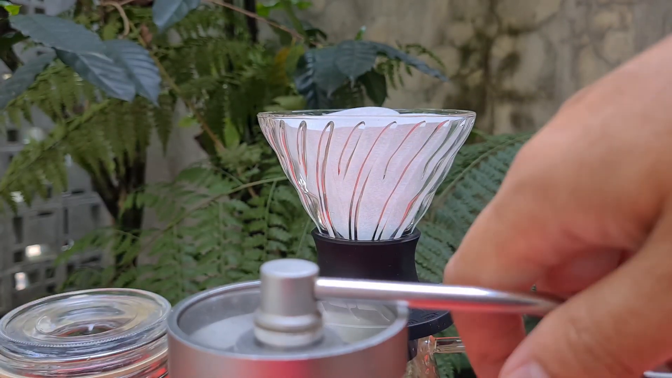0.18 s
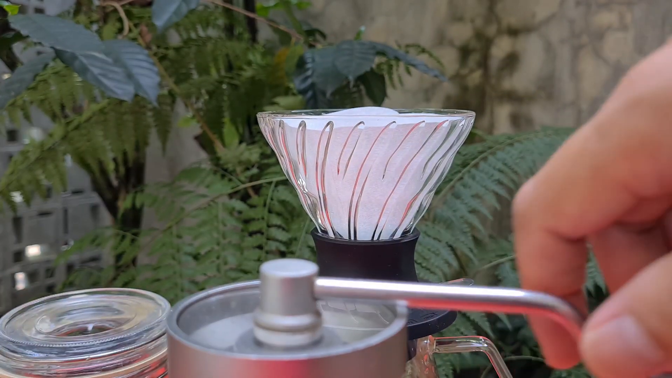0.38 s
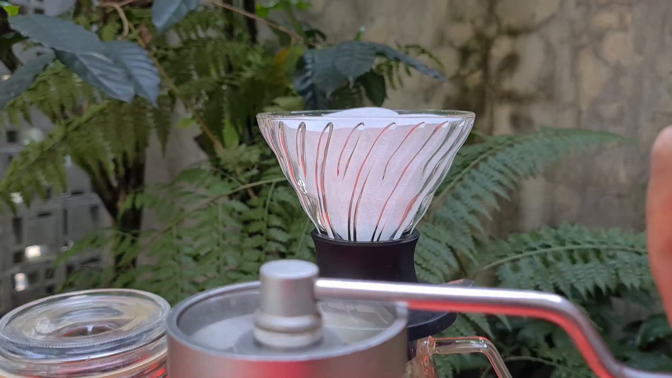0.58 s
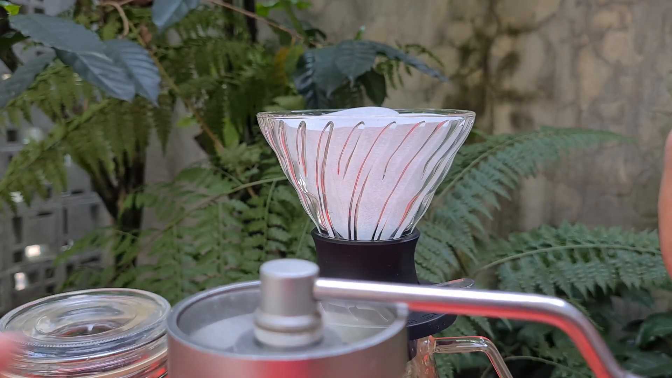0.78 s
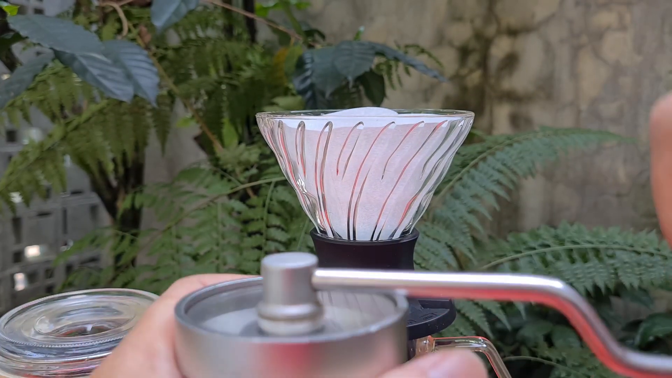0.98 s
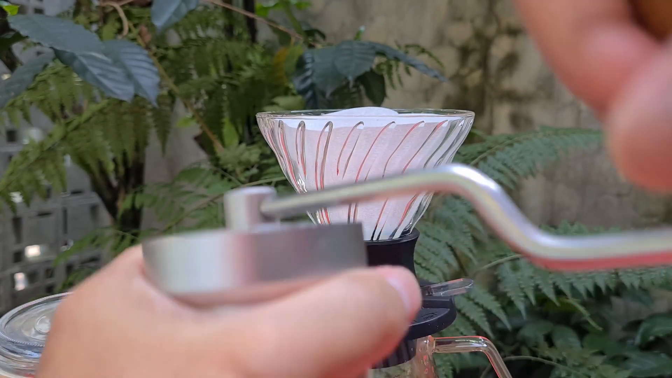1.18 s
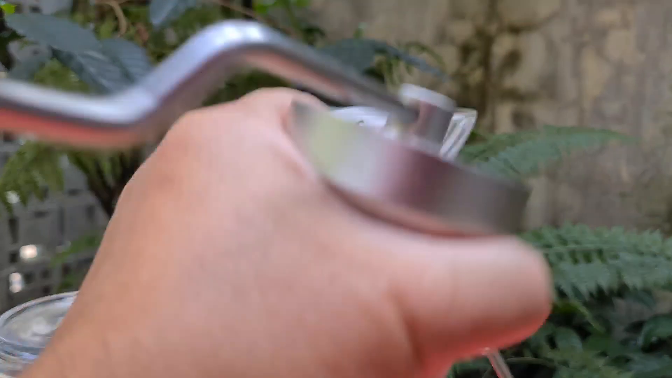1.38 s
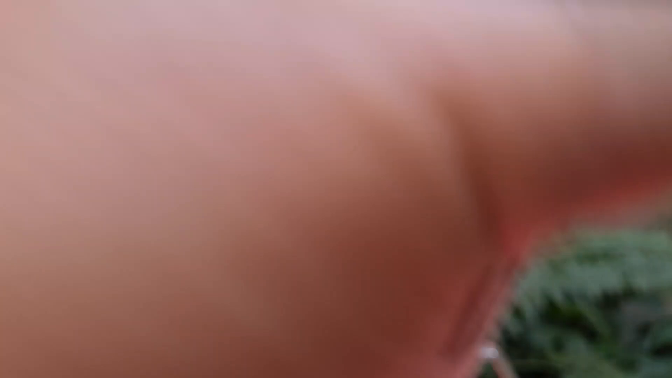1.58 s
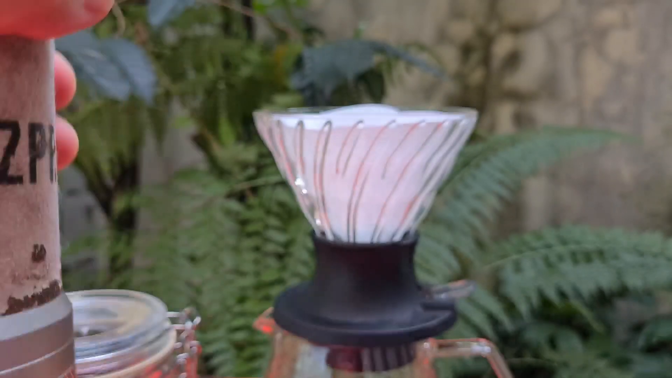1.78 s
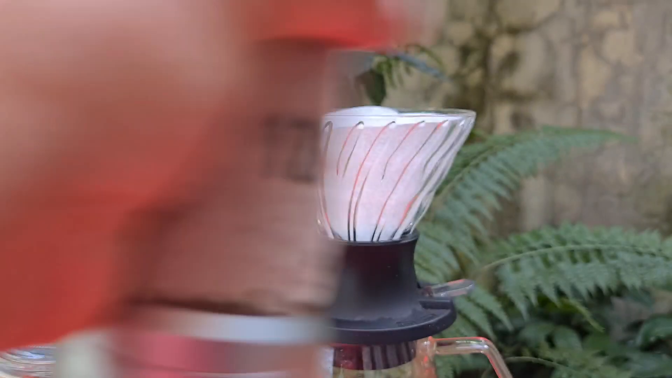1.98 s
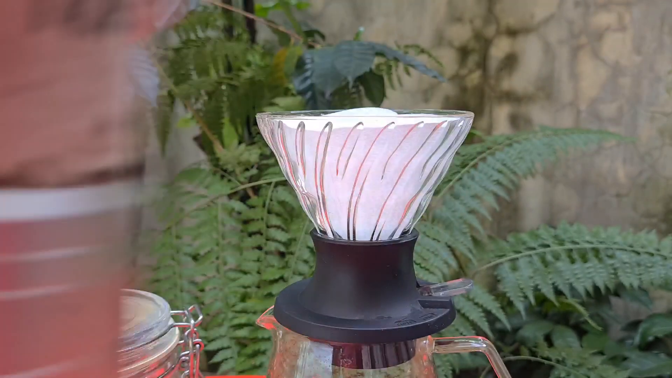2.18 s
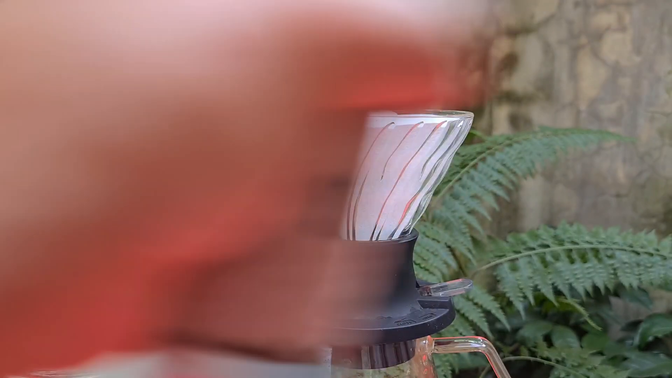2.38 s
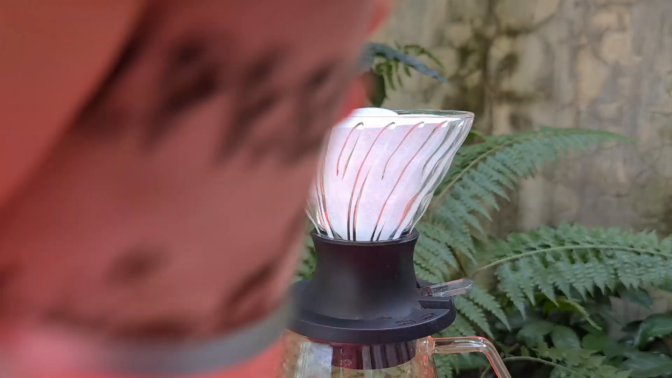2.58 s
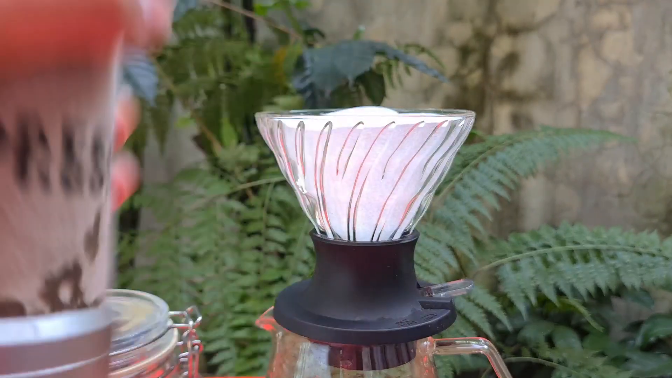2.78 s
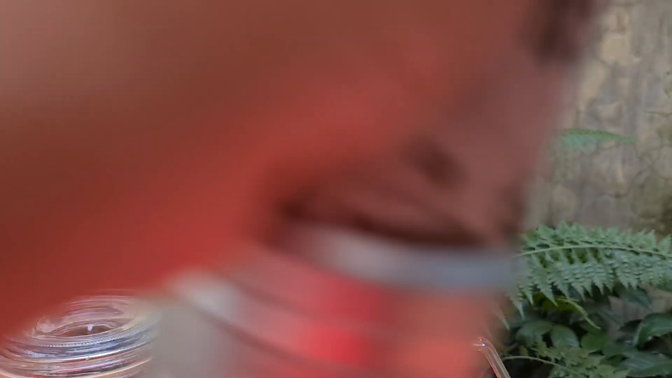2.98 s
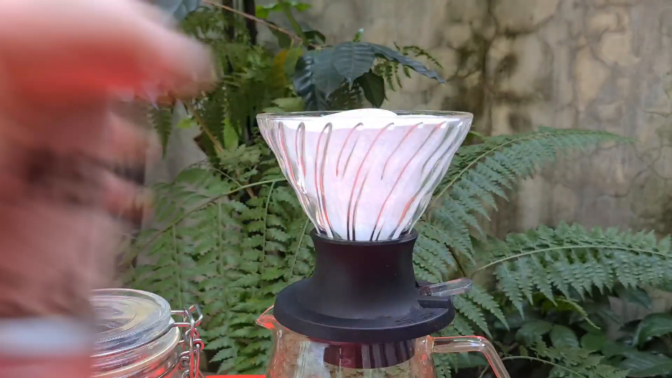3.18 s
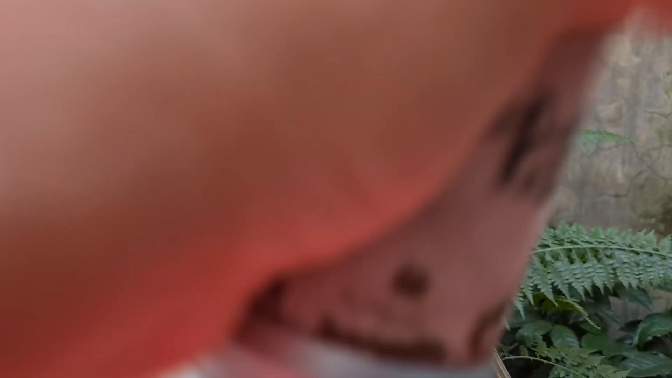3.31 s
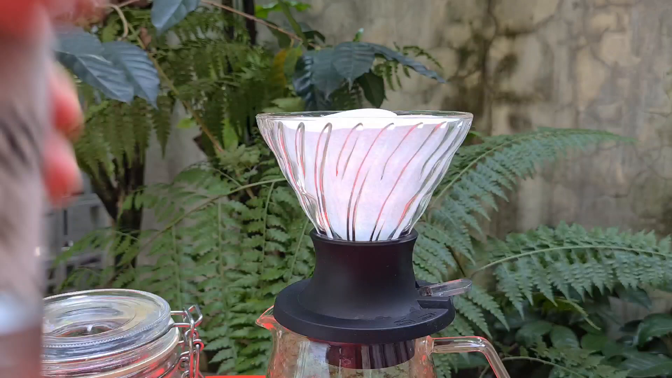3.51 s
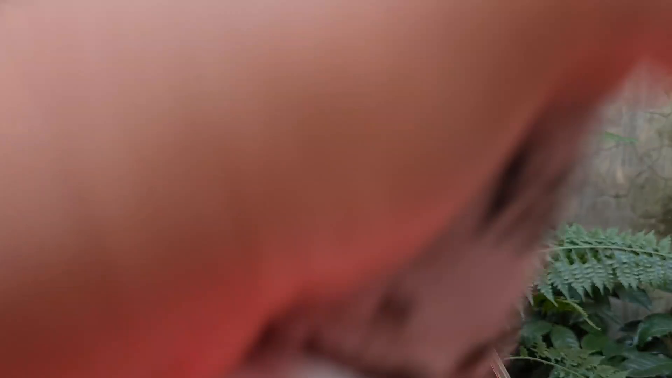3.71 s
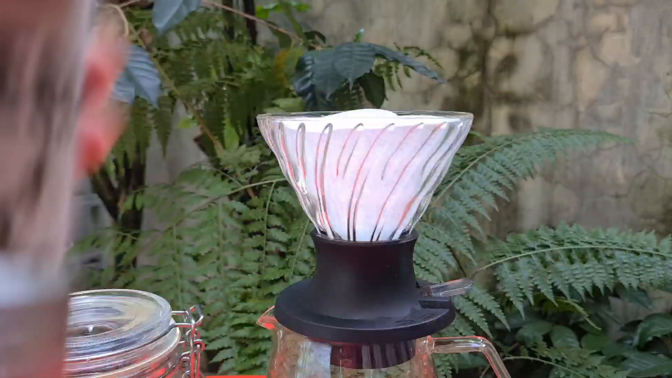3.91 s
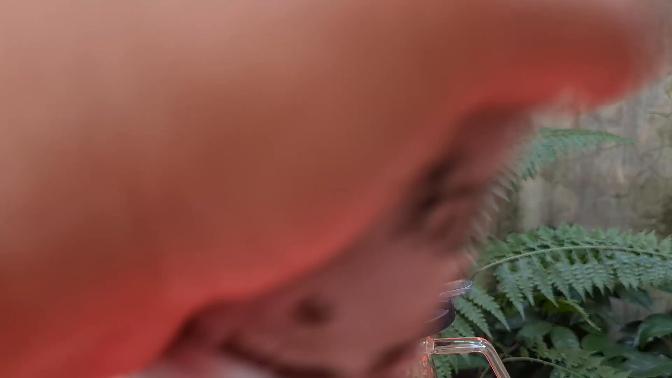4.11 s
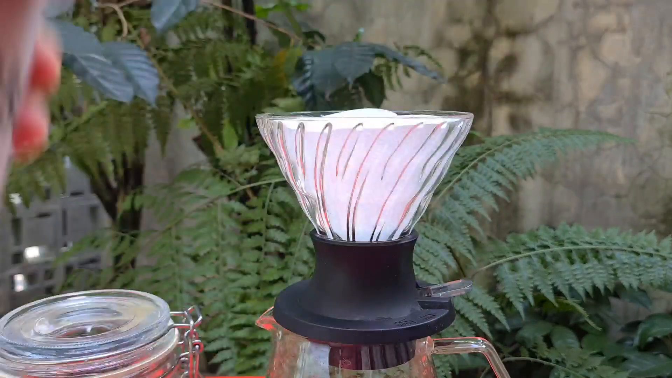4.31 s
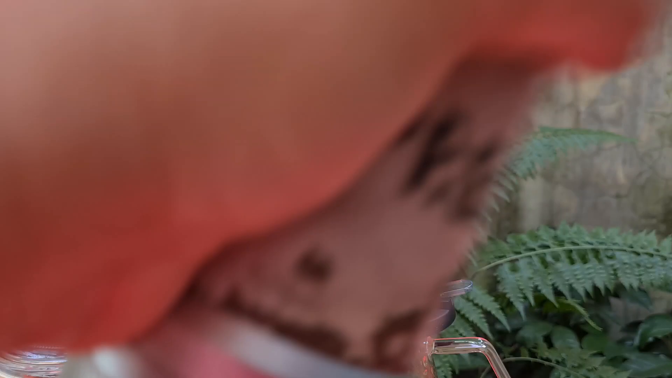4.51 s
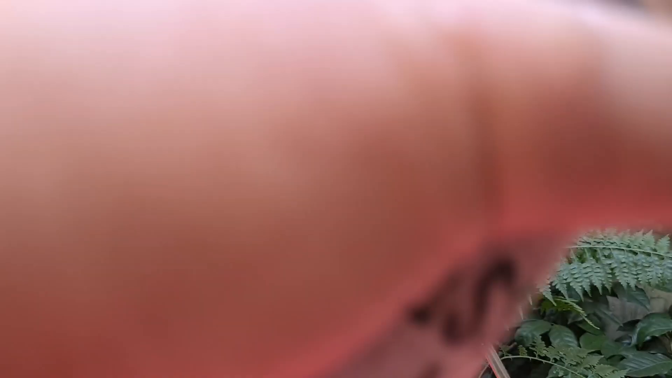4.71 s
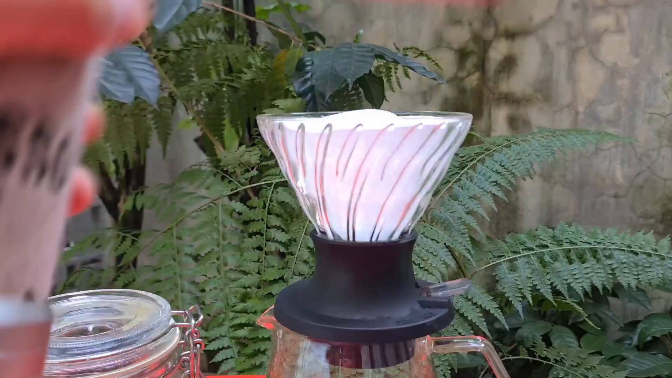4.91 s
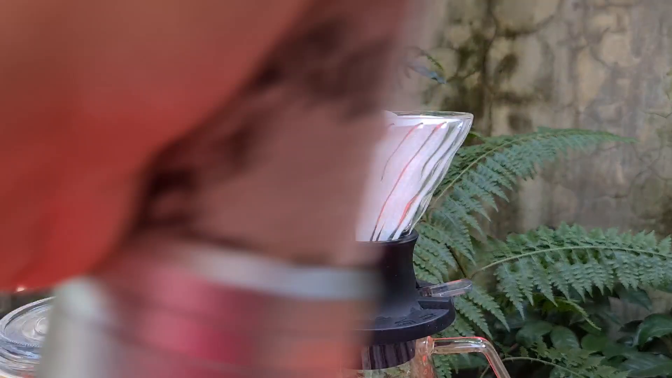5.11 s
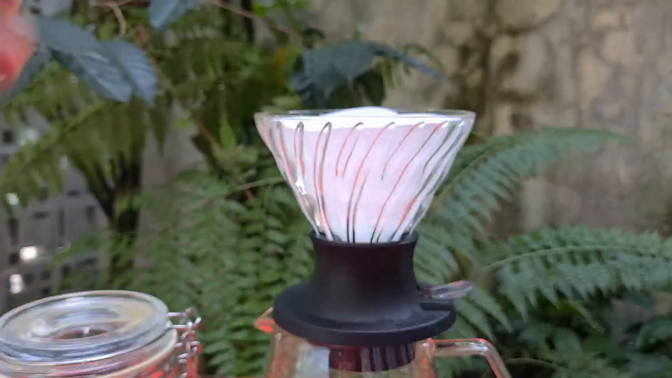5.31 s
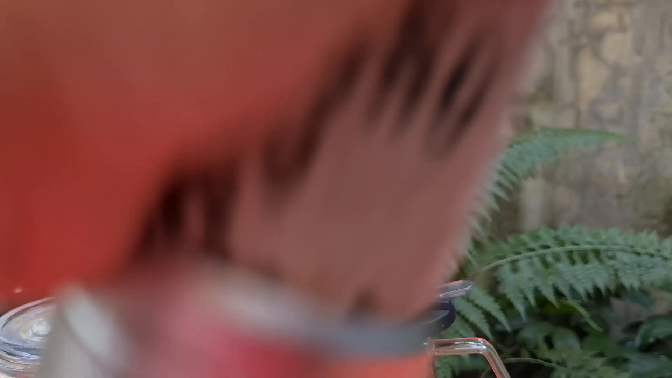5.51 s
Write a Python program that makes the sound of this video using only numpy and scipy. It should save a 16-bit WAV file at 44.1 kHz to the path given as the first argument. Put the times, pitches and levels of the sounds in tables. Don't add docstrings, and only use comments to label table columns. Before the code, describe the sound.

Wooden clatter, a brief grip and squeak, then harsh uneven crunching of coffee beans in a hollow metal hand grinder, with an insect rasping faintly outdoors.

```python
import sys
import numpy as np
from scipy import signal
from scipy.fft import rfft, irfft
from scipy.io import wavfile
from scipy.ndimage import uniform_filter1d, map_coordinates

SR = 44100
rng = np.random.default_rng(int(sys.argv[2]) if len(sys.argv) > 2 else 0)


def natural_amplitude(level_db):
    exponent = np.asarray(level_db, float) / 20
    return 10 ** exponent


def master(y):
    cut = np.clip(np.atleast_2d(y).T, -1, 1)
    pcm = np.round(cut * 32767)
    wavfile.write(sys.argv[1], SR, pcm.astype(np.int16))


N = 250929
TIME = np.arange(N) / SR


def evened(x):
    return x / np.sqrt(np.mean(x ** 2) + 1e-20)


def unit(response):
    return response / np.linalg.norm(response)


def read(points, hz):
    f, value = np.transpose(points)
    return np.interp(np.log(hz + 1), np.log(f + 1), value)


def column(tables, index, off_db=-120):
    out = np.full(N, off_db * 1.)
    for rows in map(np.array, tables):
        inside = (TIME >= rows[0, 0]) & (TIME <= rows[-1, 0])
        out[inside] = np.interp(TIME[inside], rows[:, 0], rows[:, index])
    return out


def through(x, response):
    return signal.oaconvolve(x, response, axes=-1)[..., :N]


def high_pass(x, order, hz):
    return signal.lfilter(*signal.butter(order, hz, "high", fs=SR), x)


def add(mix, s, sound):
    part = mix[round(s * SR):][:len(sound)]
    part += sound[:len(part)]


def causal(points):
    hz = abs(np.fft.fftfreq(8192, 1 / SR))
    below = np.maximum(np.log2(points[0][0] / (hz + 1)), 0)
    above = np.maximum(np.log2((hz + 1) / points[-1][0]), 0)
    gain_db = np.maximum(read(points, hz) - 40 * (below + above), -100)
    log_gain = np.log(natural_amplitude(gain_db))
    return np.fft.ifft(np.exp(log_gain - 1j * signal.hilbert(log_gain).imag)).real[:4096]


def ring(modes):
    t, out = TIME[:6000], 0
    for k, (hz, width_hz, db) in enumerate(modes):
        decay = width_hz * np.exp(-np.pi * width_hz * t)
        out = out + (-1) ** k * natural_amplitude(db) * decay * np.sin(2 * np.pi * hz * t)
    return out * (1 - np.exp(-t / 0.00043))


def slow(lo_hz, hi_hz):
    rates_hz = np.geomspace(lo_hz, hi_hz, 24) * rng.uniform(0.83, 1.1, 24)
    return evened(sum(np.sin(2 * np.pi * (f * TIME + rng.random())) / f ** 0.47 for f in rates_hz))


def hiss(points, same):
    hz = np.fft.rfftfreq(N, 1 / SR)
    a, b = rfft(rng.standard_normal((2, N)))
    c = np.clip(read(same, hz), 0, 1)
    colour = (hz > points[0][0] / 2) * natural_amplitude(read(points, hz))
    return evened(irfft(np.array([a, c * a + np.sqrt(1 - c ** 2) * b]) * colour, N))


def blip(hz, t60_s, wide):
    t, burst = TIME[:1500], rng.standard_normal(1500)
    resonance = np.exp(-np.pi * .25 * hz * t[:200]) * np.sin(2 * np.pi * hz * t[:200])
    hump = through(burst, resonance)[:1500]
    broad = signal.lfilter([1, 0, -1], [1, -1.1, .33], burst)
    x = (evened(hump) + wide * evened(broad)) * natural_amplitude(-60 * t / t60_s)
    return x / abs(x).max()


def bumps(times, rise_s, fall_s):
    age = TIME[::64] - np.reshape(times, (-1, 1))
    width = np.where(age < 0, np.reshape(rise_s, (-1, 1)), np.reshape(fall_s, (-1, 1)))
    return np.exp(-(age / width) ** 2)


def summed_db(bells, db, base_db=-120):
    power = natural_amplitude(db) ** 2 @ bells + natural_amplitude(base_db) ** 2
    return np.interp(TIME, TIME[::64], 10 * np.log10(power))


# f/Hz, level/dB per Hz
AIR_SPECTRUM = [(12, -49), (20, -1), (32, -4), (53, 7.5), (101, 0.5), (146, 1.5), (182, -2.5), (607, -17.5),
                (873, -21), (1030, -16.5), (1570, -30.5), (3840, -23), (4300, -26), (7500, -28.5),
                (8000, -42), (14600, -33), (16000, -60)]
# f/Hz, share
AIR_LIKENESS = [(60, 0.93), (300, 0.93), (1000, 0.071), (3000, 0.04)]


def garden_air():
    return natural_amplitude(-46.5 + np.array([[1.5], [-1.5]])) * hiss(AIR_SPECTRUM, AIR_LIKENESS)


# f/Hz, width/Hz, level/dB
INSECT_MODES = [(6260, 110, -7), (6600, 170, 0)]


def insect():
    start_s, every_s, rise_s, fall_s = -0.027, 0.495, 0.065, 0.091
    clicks_per_s, quiet_s, level_db = 5000, 4.3, -56
    age = (TIME - start_s) % every_s
    swell = (1 - np.exp(-age / rise_s)) * np.exp(-(age / (2 * fall_s)) ** 2)
    clicks = rng.standard_normal((2, N)) * (rng.random(N) < clicks_per_s / SR) * (TIME < quiet_s)
    return natural_amplitude(level_db) * evened(through(clicks * swell, ring(INSECT_MODES)[None]))


# stop t/s, restart t/s, still missing at restart/dB, trickling grounds level/dB
RESTS_OF_CRANK = [
    (0, 1.173, -62, -150),
    (1.385, 1.46, -2, -51),
    (1.752, 1.78, -24, -66),
    (2.488, 2.676, -24, -42.5),
    (4.539, 4.694, -23, -47.5),
    (4.966, 5.019, -6, -68),
]


def rests():
    stop_db_per_s, stop_db = 2000, 24
    dying_db_per_s, creep_db_per_s, trickle_db_per_s = 247, 599, 119
    gain_db, trickle_db = np.zeros(N), np.full(N, -120.)
    for k, (stop, restart, missing_db, falling_db) in enumerate(RESTS_OF_CRANK):
        inside = (TIME >= stop) & (TIME < restart)
        age, left = TIME[inside] - stop, restart - TIME[inside]
        dying = -np.minimum(stop_db_per_s * age, stop_db) - dying_db_per_s * age
        dying = dying - 99 * (k == 0)
        gain_db[inside] = np.maximum(dying, np.minimum(missing_db, 0) - creep_db_per_s * left)
        trickle_db[inside] = falling_db - trickle_db_per_s * age
    return gain_db, trickle_db


# f/Hz, level/dB per Hz
WOBBLE_SPECTRUM = [(8.8, -42), (15, -16), (32, 9), (54, 7), (161, -10.5), (190, -7.5), (217, -11),
                   (333, -13), (442, -34), (520, -6.5), (680, -32), (1140, -120)]
# t/s, wobble level/dB, thump level/dB
ARM_PULLS = [(1.0, -45.5, -48), (1.19, -60, -33), (1.3, -35.5, -39.5), (1.49, -33, -38), (1.94, -29.5, -35),
             (2.34, -30.5, -37.5), (2.7, -35, -45), (2.89, -39, -31.5), (3.239, -32.5, -32),
             (3.661, -31.5, -36.5), (4.039, -34.5, -28.5), (4.459, -31.5, -40.5), (4.71, -37, -47),
             (5.07, -35, -35.5), (5.45, -34, -31.5)]


def shake():
    rise_s, fall_s, thump_hz, thump_s = 0.049, 0.17, 146, 0.036
    s, wobble_db, thump_db = np.transpose(ARM_PULLS)
    same = [(20, 0.98), (200, 0.88)]  # f/Hz, left-right likeness
    cranked = TIME > RESTS_OF_CRANK[0][1]
    rest_db = 0.54 * rests()[0].clip(-40) * cranked
    wobble = hiss(WOBBLE_SPECTRUM, same) * natural_amplitude(summed_db(bumps(s, rise_s, fall_s), wobble_db) + rest_db)
    thump = hiss([(thump_hz / 2, -12), (thump_hz, 0), (3 * thump_hz, -12), (6 * thump_hz, -50)], same)
    thump = thump * natural_amplitude(summed_db(bumps(s, thump_s / 2, thump_s), thump_db) - 2.0)
    return natural_amplitude([[2.5], [-2.5]]) * (wobble + thump)


# f/Hz, level/dB, t60/s
BOARD_MODES = [(167.3, 0.5, 0.3), (220, 1, 0.1), (272, -3.5, 0.098), (345, -5.5, 0.34), (416, -18, 0.049),
               (456, -6.5, 0.18)]
# f/Hz, t60/s
LEG_MODE = (88.4, 0.25)
# f/Hz, level/dB per Hz
CLACK_SPECTRUM = [(260, -16.5), (450, 1), (923, -4.5), (1260, -5.5), (2290, -27), (3120, -25), (3780, -35),
                  (6790, -44), (7750, -51), (15000, -57)]
# t/s, board peak/dB, leg thud/dB, clack/dB, clack treble/dB
TABLE_KNOCKS = [
    (0.42, -8, -35, -29, -46),
    (0.432, -11, -27.5, -35, -58),
    (0.447, -15, -26, -40, -58),
    (0.509, -2, -20, -20, -21.5),
    (0.519, -15, -27, -23, -55),
    (0.528, -13, -20, -31, -44),
    (0.543, -16.5, -49, -31, -42),
    (0.556, -14.5, -29, -33, -51),
    (0.58, -23, -46, -23.5, -27.5),
    (1.003, -48, -24.5, -42, -42),
]


def table():
    out, t, colour, t60_s = np.zeros(N), TIME[:16000], causal(CLACK_SPECTRUM), 0.084
    low = signal.butter(1, 1500, fs=SR)
    leg_hz, leg_t60_s = LEG_MODE
    for s, board_db, legs_db, clack_db, treble_db in TABLE_KNOCKS:
        boards = 0
        for hz, db, ring_s in BOARD_MODES:
            db_off, hz_off = rng.standard_normal(2)
            tone = np.sin(2 * np.pi * hz * (1 + 0.0586 * hz_off) * t)
            boards = boards + natural_amplitude(db + 1.9 * db_off - 60 * t / ring_s) * tone
        legs = natural_amplitude(legs_db - 60 * t / leg_t60_s) * np.sin(2 * np.pi * leg_hz * t)
        add(out, s, (natural_amplitude(board_db - 13.0) * boards + legs) * (1 - np.exp(-t / 0.0026)))
        burst = through(rng.standard_normal(len(t)), colour)[:len(t)]
        body = evened(signal.lfilter(*low, burst)) * natural_amplitude(clack_db + 2.5 - 60 * t / t60_s)
        add(out, s, body * (1 - np.exp(-t / 0.00084)))
        add(out, s, evened(high_pass(burst, 2, 1500)) * natural_amplitude(treble_db + 3.5 - 60 * t / (0.73 * t60_s)))
    return out


# f/Hz, width/Hz, level/dB
LOWER_MODES = [(560, 31.5, -14), (915.8, 69.3, 1.5), (982, 83, 0.5)]
UPPER_MODES = [(1052, 123, -3.5), (1209.6, 151, 4.5)]
# peak t/s, chamber level/dB, rise/s, fall/s
HAND_RUBS = [
    (.415, -53, 0.037, .004),
    (0.919, -40.5, 0.0075, 0.0056),
    (1.004, -29.5, 0.011, 0.0047),
    (1.112, -38.5, 0.012, 0.0083),
    (1.137, -53, 0.011, .006),
    (1.165, -50, 0.0043, 0.0037),
]
# t/s, level/dB, f/Hz
BEARING_SQUEAK = [
    [(1.03, -53, 2550), (1.126, -45, 2610), (1.14, -29, 2650)],
    [(1.15, -39, 2680), (1.172, -39, 2680)],
]
# t/s, level/dB, half length/s, lowest f/Hz
SLEEVE_SWISH = (.94, -57, .03, 9000)
# t/s, peak/dB, f/Hz
METAL_TICKS = [
    (0.9157, -42, 2980),
    (0.9997, -23, 2200),
    (1.114, -26, 2700),
]


def handling():
    s, db, rise, fall = np.transpose(HAND_RUBS)
    rub = rng.standard_normal(N) * natural_amplitude(summed_db(bumps(s, rise, fall), db))
    out = through(rub, unit(ring(LOWER_MODES[1:] + UPPER_MODES[:1])))
    turns = np.cumsum(column(BEARING_SQUEAK, index=2, off_db=0) * (1 + .01 * slow(30, 500))) / SR
    squeak_db = column(BEARING_SQUEAK, index=1) - 0.5 + 1.5 * slow(27.0, 220)
    out = out + natural_amplitude(squeak_db) * np.sin(2 * np.pi * turns)
    s, db, half_s, hz = SLEEVE_SWISH
    brushed = high_pass(rng.standard_normal(N), 4, hz)
    out += brushed * natural_amplitude(summed_db(bumps([s], half_s, half_s), [db]))
    for s, db, hz in METAL_TICKS:
        add(out, s, natural_amplitude(db) * blip(hz, 0.041, 0.028))
    return out


def chips():
    per_s, spread_db, clump_db = 5500, 3.5, 1.15
    size = natural_amplitude(spread_db * np.minimum(rng.exponential(1, N), 3.2) + clump_db * slow(11, 160))
    train = size * rng.choice([-1., 1.], N) * (rng.random(N) < per_s / SR)
    kind = rng.integers(0, 12, N)
    shapes = evened(rng.standard_normal((12, 300)) * natural_amplitude(-60 * TIME[:300] / 0.0054))
    return evened(sum(through(train * (kind == k), shape) for k, shape in enumerate(shapes)))


def splinters():
    per_s, spread_db = 700, 2.5
    size = natural_amplitude(spread_db * np.minimum(rng.exponential(1, N), 4)) * rng.choice([-1., 1.], N)
    tick = rng.standard_normal(60) * natural_amplitude(-60 * TIME[:60] / 0.0066)
    return evened(through(size * (rng.random(N) < per_s / SR), tick))


# t/s, peak/dB, f/Hz
GAP_RASPS = [(1.174, -10.5, 2390), (1.2786, -23, 1680), (1.4637, -17, 1970), (1.537, -9.5, 1740),
             (1.6887, -17, 2240), (1.7785, -26, 2570), (1.8812, -9.5, 3470), (1.9755, -14, 1790),
             (2.0479, -23, 1850), (2.1706, -16.5, 2460), (2.2394, -10, 2700), (2.3776, -13, 1830),
             (2.4624, -22, 1800), (2.6834, -17, 1620), (2.7582, -16, 2270), (2.9004, -7, 1740),
             (3.0117, -11.5, 2100), (3.1553, -9, 3360), (3.2456, -14, 1750), (3.317, -17, 2720),
             (3.4267, -3, 3350), (3.53, -14, 2770), (3.6747, -27, 1830), (3.7545, -3, 3450),
             (3.8572, -8, 2750), (3.963, -7, 3460), (4.1072, -5.5, 2170), (4.2179, -13, 2350),
             (4.2928, -12, 1940), (4.403, -9, 3470), (4.4808, -11, 3520), (4.6963, -35, 3050),
             (4.835, -7, 2860), (5.0046, -31, 1970), (5.0775, -21, 2550), (5.2137, -6, 2840),
             (5.3778, -11, 2670), (5.4536, -13, 2240), (5.5469, -5.5, 2640), (5.6382, -9, 2690)]


def rasps(drive):
    width_hz, up_s, down_s, level_db = 220, .015, .05, -18
    out = np.zeros(N)
    age = TIME[:6000] - 2 * up_s
    swell = np.exp(-(age / np.where(age < 0, up_s, down_s)) ** 2)
    r = np.exp(-np.pi * width_hz / SR)
    for s, db, hz in GAP_RASPS:
        part = drive[round((s - up_s) * SR):][:6000]
        rung = signal.lfilter([1, 0, -1], [1, -2 * r * np.cos(2 * np.pi * hz / SR), r * r], part)
        add(out, s - up_s, natural_amplitude(db + level_db) * evened(rung) * swell[:len(part)])
    return out


# t/s, peak/dB, strongest f/Hz
BEAN_SNAPS = [(1.1463, -18, 5460), (1.1738, -3, 1550), (1.1917, 1, 1660), (1.2346, -11, 1940),
              (1.274, -4, 5100), (1.3264, -11.5, 5290), (1.4431, -12, 1760), (1.4636, -7, 1820),
              (1.4781, -13, 2080), (1.511, -4, 1600), (1.5369, -6, 1760), (1.6886, -7, 2290),
              (1.734, -6.5, 2310), (1.7784, -12, 2480), (2.0478, -16, 1860), (2.1311, -6.5, 3470),
              (2.1705, -3, 2420), (2.3775, -2.5, 1620), (2.4623, -5, 1820), (2.6733, -16, 3000),
              (2.6833, -6, 1660), (2.7582, 3.5, 2330), (2.8724, -9.5, 5340), (2.9008, -12, 1720),
              (2.9248, -7.5, 3430), (3.0116, -9.5, 2150), (3.2455, -21, 1750), (3.2715, -5, 5330),
              (3.4266, -5, 3200), (3.5299, -20, 2950), (3.5538, -14, 2500), (3.6751, -20, 3500),
              (3.7539, -5, 3250), (3.7848, -8.5, 2280), (3.8572, -9, 2970), (3.9629, -7.5, 3360),
              (4.0023, -9, 3360), (4.1061, -6.5, 2260), (4.1844, -6.5, 2770), (4.2183, -6, 2370),
              (4.2712, -10, 1900), (4.3416, -5.5, 2650), (4.4029, -8.5, 3420), (4.4423, -12, 3230),
              (4.4822, -2.5, 5250), (4.6773, -33, 2350), (4.6962, -10, 3100), (4.7082, -4, 3200),
              (4.7416, -8, 2320), (4.8354, -7, 3020), (5.005, -17, 2670), (5.0195, -23, 3230),
              (5.0769, -6, 2500), (5.1382, -16, 2930), (5.2141, -8, 2820), (5.459, -13, 3160),
              (5.5149, -2, 2840), (5.5463, -0.5, 2900), (5.6386, -14, 2830), (5.6566, -4.5, 2360)]


def snaps():
    out = np.zeros(N)
    for s, db, hz in BEAN_SNAPS:
        add(out, s, natural_amplitude(db) * blip(hz, 0.015, 0.46))
    return signal.lfilter(*signal.butter(2, [800, 10500], "band", fs=SR), out)


# t/s, peak/dB, strongest f/Hz
SKIN_CRACKS = [(1.1468, -15.5, 10000), (1.174, -12, 6640), (1.192, -17, 6860), (1.235, -13, 8670),
               (1.303, -8, 9010), (1.3264, -9, 7040), (1.4426, -29, 9380), (1.4645, -18, 9040),
               (1.4786, -5.5, 6700), (1.5502, -10.5, 9170), (1.674, -14.5, 6810), (1.7065, -11.5, 9280),
               (1.7365, -6, 6180), (1.78, -18, 8980), (2.055, -18, 8230), (2.074, -13, 9430),
               (2.1351, -11, 8380), (2.1705, -11.5, 8970), (2.2398, -15.5, 6050), (2.378, -27, 7350),
               (2.4466, -13, 7250), (2.4633, -11, 6920), (2.6815, -20, 8560), (2.6963, -10, 8920),
               (2.901, -3.5, 7000), (2.926, -8, 8980), (3.0206, -13, 9350), (3.0853, -16, 8410),
               (3.2146, -6, 6530), (3.2715, -20, 6000), (3.285, -6, 6000), (3.3174, -12, 7240),
               (3.3776, -21, 7120), (3.3962, -12, 8770), (3.4481, -13, 8560), (3.5303, -10.5, 8800),
               (3.6801, -15, 6090), (3.7534, -16, 6060), (3.8909, -6.5, 6200), (3.9498, -12, 8500),
               (3.979, -15, 8440), (4.0028, -18, 8860), (4.108, -17, 6130), (4.135, -8, 6140),
               (4.1839, -22, 7080), (4.2717, -21, 8990), (4.3421, -16, 8640), (4.4733, -13, 8870),
               (4.483, -9, 6040), (4.696, -21, 8480), (4.7252, -12.5, 6400), (4.7704, -15, 6700),
               (4.83, -18, 8930), (4.8457, -10, 8680), (5.006, -19.5, 7020), (5.0195, -21, 8800),
               (5.041, -19, 9140), (5.0763, -14.5, 9510), (5.459, -8.5, 6990), (5.547, -15, 6890)]


def cracks():
    out = np.zeros(N)
    for s, db, hz in SKIN_CRACKS:
        add(out, s, natural_amplitude(db + 4.5) * blip(hz, 0.0083, 0.78))
    return high_pass(out, 2, 4500)


# t/s, peak/dB, ringing f/Hz
BURR_JOLTS = [(1.146, -11.5, 1050), (1.174, -1.5, 946), (1.206, -8, 937), (1.235, -1, 927),
              (1.277, -3, 1056), (1.298, -0.5, 932), (1.354, 0, 944), (1.446, -11, 1000), (1.467, 1.5, 926),
              (1.486, -4.5, 1213), (1.55, -2, 988), (1.608, -8, 958), (1.783, -11, 954), (1.849, -12, 958),
              (1.998, -8.5, 1003), (2.031, -13, 1007), (2.065, -2, 1240), (2.085, -5.5, 990),
              (2.127, -9, 917), (2.288, -8, 1033), (2.379, -3.5, 950), (2.464, -1, 973), (2.686, -8, 982),
              (2.709, -2, 939), (2.902, -10, 967), (2.925, -9, 954), (3.159, -11, 930), (3.2, -13, 990),
              (3.214, -7, 1045), (3.287, -4, 942), (3.311, -9.5, 1090), (3.333, -8, 1056),
              (3.35, -3.5, 1160), (3.557, -10, 1010), (3.659, -5, 964), (3.788, -5, 935),
              (4.016, -24, 1030), (4.053, -7, 1020), (4.105, -12, 960), (4.127, -6, 1172),
              (4.172, -15, 1140), (4.272, -15, 907), (4.403, -8.5, 986), (4.443, -11, 977),
              (4.469, -3, 969), (4.679, -32, 1190), (4.704, -28, 1000), (4.729, -7, 980),
              (4.759, -3.5, 960), (5.006, -36, 1070), (5.022, -25, 1250), (5.043, -13, 956),
              (5.12, -10, 985), (5.152, -4.5, 1146), (5.165, -6, 1126), (5.212, -2.5, 963),
              (5.393, -7.5, 1043), (5.459, -3.5, 980), (5.533, -7, 1046), (5.551, -4.5, 950)]


def stalls():
    stall_s, stall_db = .005, -10
    stuck = np.zeros(N)
    for s, *_ in BURR_JOLTS:
        add(stuck, s - 2 * stall_s, np.linspace(0, 1, round(2 * stall_s * SR)))
    return natural_amplitude(stall_db * np.minimum(stuck, 1))


def jolts():
    out, t = np.zeros(N), TIME[:6000]
    body = ring(LOWER_MODES + UPPER_MODES) * natural_amplitude(-60 * t / .04) * (1 - np.exp(-t / .0008))
    body = body / abs(body).max()
    envelope = natural_amplitude(-60 * t / 0.064) * (1 - np.exp(-t / 0.00065))
    for s, db, hz in BURR_JOLTS:
        add(out, s, natural_amplitude(db - 3.5) * (envelope * np.sin(2 * np.pi * hz * t) + 0.33 * body))
    return out


# peak t/s, chamber level/dB, crackle over chamber/dB, upper modes over chamber/dB
BURR_BITES = [(1.19, -20, -4, 2.5), (1.27, -35, -20, 12), (1.36, -16, -39, -8.5), (1.5, -17, -9, 0.5),
              (1.6, -18.5, -9.5, -1), (1.71, -17, -14.5, -9), (1.84, -29.5, 1, 0), (2.002, -26, -2.5, -2),
              (2.09, -19.5, -5.5, 2.5), (2.2, -21.5, -9.5, -5), (2.359, -24, 0, -3), (2.45, -23, -4, 5.5),
              (2.726, -19.5, -1.5, -7), (2.904, -23, -4.5, 0.5), (3.038, -20.5, -10, -2.5),
              (3.25, -23.5, -1, -1.5), (3.364, -18, -5, -4), (3.54, -21, -1.5, -10),
              (3.668, -21.5, 0, -1.5), (3.814, -18, -3, -3.5), (4.0, -18.5, -6.5, -6.5),
              (4.138, -21.5, -1.5, 1), (4.28, -23.5, -7, -7), (4.472, -24.5, -2, 3), (4.749, -18.5, -3, -2),
              (4.87, -25.5, -28, -10), (5.055, -22, -3, -6), (5.192, -19, -2.5, -1), (5.442, -22, -3, -4),
              (5.566, -19.5, -3, 0.5)]
# f/Hz, level/dB per Hz
SHELL_SPECTRUM = [(150, -0.5), (300, -0.5), (420, -5.5), (700, 4.5), (850, -5), (1400, -5), (1700, -13.5)]
# f/Hz, level/dB per Hz
CRUNCH_SPECTRUM = [(900, -8.5), (1400, -9.5), (1540, -0.5), (1840, 4), (2050, -4), (2300, 1.5), (2600, -1),
                   (3180, -1), (3750, -13), (4300, -12), (5590, -11.5), (9460, -120)]
# f/Hz, level/dB per Hz
GRIT_SPECTRUM = [(2410, -10.5), (4100, -1), (5290, -6.5), (5730, -6), (7270, -7), (7840, -12.5),
                 (8500, -4.5), (9110, -4.5), (10800, -13.5), (11800, -12.5), (14900, -18), (15700, -28),
                 (16300, -79)]


def grind():
    bite_rise_s, bite_fall_s, idle_db = 0.054, 0.071, -30.5
    dust_share, splinter_db = .6, -9
    press_db, press_s, grip_bend_s = 11, 0.0079, .0003
    s, bite_db, crackle_db, upper_db = np.transpose(BURR_BITES)
    bells = bumps(s, bite_rise_s, bite_fall_s)
    gain_db, trickle_db = rests()
    level = natural_amplitude(summed_db(bells, bite_db, idle_db) + gain_db)
    upper_level = natural_amplitude(summed_db(bells, bite_db + upper_db, idle_db - 18) + gain_db)
    crunch_db = summed_db(bells, bite_db + crackle_db, idle_db + 1.5) + gain_db

    fractures = np.sqrt(1 - dust_share) * chips() + np.sqrt(dust_share) * rng.standard_normal(N)
    stick = stalls()
    drive = stick * fractures
    sharp = stick * (fractures + natural_amplitude(splinter_db) * splinters())

    pressed = bumps(np.transpose(ARM_PULLS)[0], press_s, press_s).sum(0)
    pressed = np.interp(TIME, TIME[::64], pressed)
    lowest_level = level * natural_amplitude(-20.5 + press_db * pressed)

    chamber = through(drive * level * natural_amplitude(-1.5), unit(ring(LOWER_MODES[1:])))
    out = map_coordinates(chamber, [np.arange(N) + grip_bend_s * SR * slow(3, 14)], order=3)
    out = out + through(drive * lowest_level, unit(ring(LOWER_MODES[:1])))
    out = out + through(drive * upper_level, unit(ring(UPPER_MODES)))
    out = out + through(drive * level * natural_amplitude(-21), unit(causal(SHELL_SPECTRUM)))
    crunch = sharp * (natural_amplitude(crunch_db - 1.0) + natural_amplitude(trickle_db))
    out = out + through(crunch, unit(causal(CRUNCH_SPECTRUM)))
    grit = sharp * (natural_amplitude(crunch_db - 5.0) + natural_amplitude(trickle_db + 2.5))
    out = out + through(grit, unit(causal(GRIT_SPECTRUM)))
    return out + rasps(sharp * natural_amplitude(gain_db)) + jolts() + snaps() + cracks()


# f/Hz, t60/s
WALL_DECAY = [(300, 0.3), (1000, 0.08), (4000, 0.12), (12000, 0.13)]


def tail(length_s, first_s):
    taps = np.zeros((2, round(length_s * SR)))
    at = np.arange(round(first_s * SR), taps.shape[1] - 20, 20)
    at = at + rng.integers(0, 20, (2, len(at)))
    np.put_along_axis(taps, at, rng.choice([-1., 1.], at.shape), 1)
    hz, t, z = signal.stft(taps, SR, nperseg=128)
    decay = natural_amplitude(-60 * t / read(WALL_DECAY, hz)[:, None])
    out = signal.istft(z * decay, SR, nperseg=128)[1]
    return out / np.linalg.norm(out[0])


# f/Hz, lead/s
LEFT_LEAD = [(500, 0.00045), (1000, 0.000098), (2000, 0.00029), (8000, 0.000317)]
# f/Hz, phase/rad
PHASE_SCATTER = [(200, 0.15), (900, 0.3), (1500, 0.75), (3000, 1.68), (12000, 1.62)]
# f/Hz, level/dB
LEFT_BALANCE = [(100, 3), (300, -0.5), (900, 5.5), (1300, 2), (3000, 1.5), (6000, -1.5), (10000, 1.5)]


def placed(x):
    turns_per_s, swing_s, walls_db = 2.3, .00006, -9
    hz, t, z = signal.stft(x, SR, nperseg=512, noverlap=384)
    lead = read(LEFT_LEAD, hz)[:, None] + swing_s * np.sin(2 * np.pi * (turns_per_s * t + 0.32))
    side = np.array([.5, -.5])[:, None, None]
    drift = rng.standard_normal((len(t), len(hz), 2, 2)).T
    for _ in range(2):
        drift = uniform_filter1d(drift, size=10, axis=2)
        drift = uniform_filter1d(drift, size=3, axis=3)
    stir, shade = evened(drift) * read(PHASE_SCATTER, hz)[:, None]
    paths = np.exp(2j * np.pi * hz[:, None] * lead * side + 1j * stir)
    paths = paths * natural_amplitude(read(LEFT_BALANCE, hz)[:, None] * side + 1.42 * shade)
    near = signal.istft(z * paths, SR, nperseg=512, noverlap=384)[1][:, :N]
    to_walls = high_pass(x, 1, 900)
    return near + natural_amplitude(walls_db) * through(to_walls[None], tail(0.55, .008))


def scene():
    background = garden_air() + insect() + shake()
    return background + placed(table() + natural_amplitude(1.0) * (handling() + grind()))


def band_limit(x):
    return signal.sosfilt(signal.butter(12, 16490, fs=SR, output="sos"), x)


def record(dry):
    limited = np.clip(1.4 * np.tanh(dry / 1.4), -.97, .97)
    edged = signal.oaconvolve(limited, signal.firwin(201, 15950, fs=SR)[None], "same")
    return band_limit(edged)


dry = scene()
out = record(dry)
master(out)
```